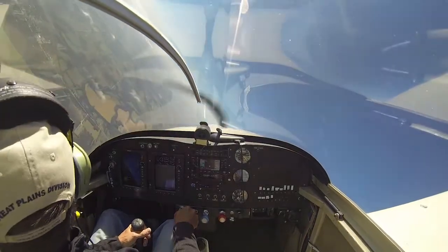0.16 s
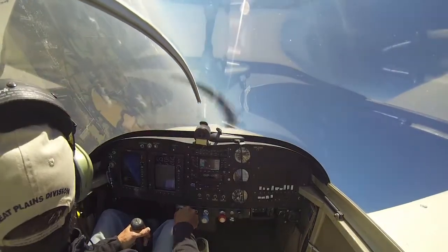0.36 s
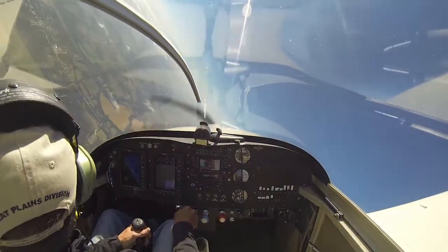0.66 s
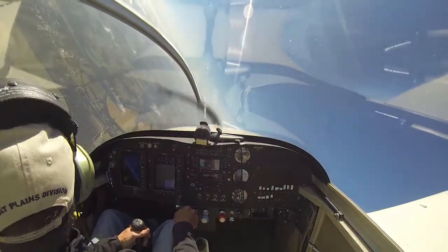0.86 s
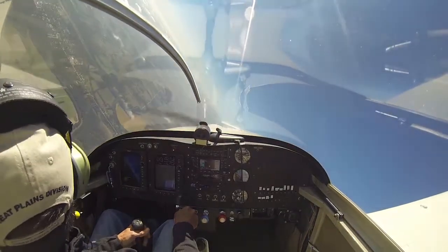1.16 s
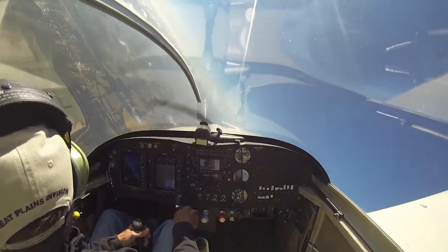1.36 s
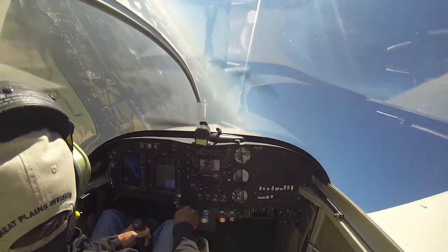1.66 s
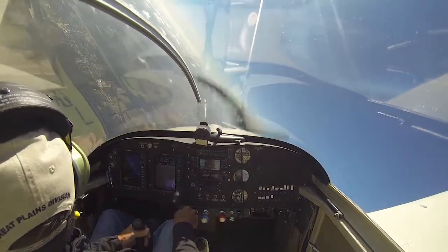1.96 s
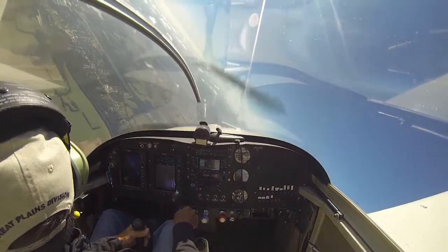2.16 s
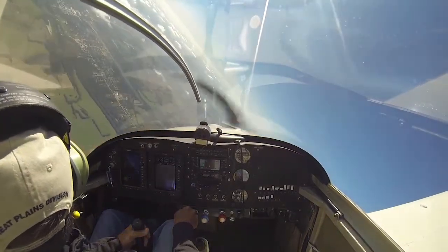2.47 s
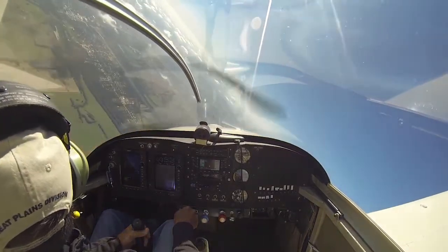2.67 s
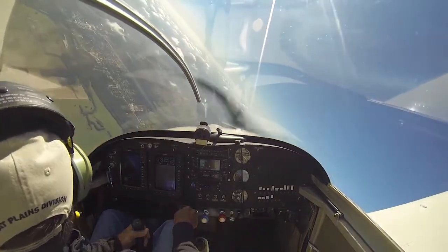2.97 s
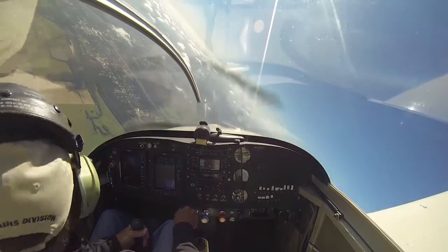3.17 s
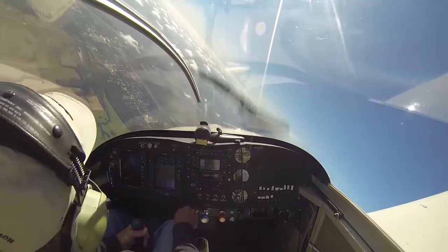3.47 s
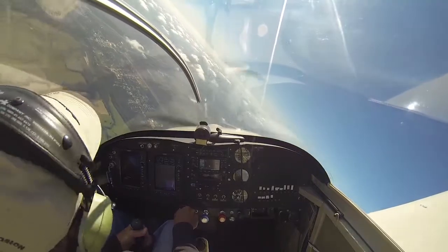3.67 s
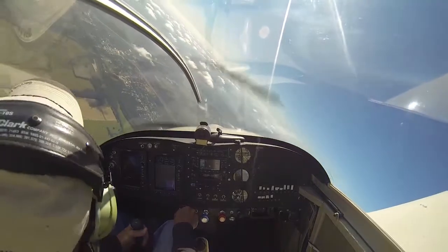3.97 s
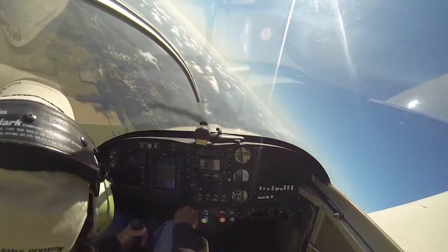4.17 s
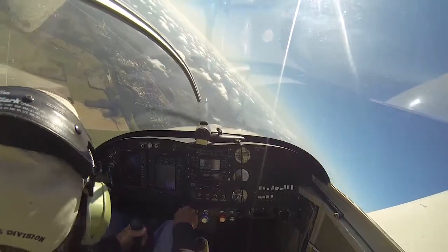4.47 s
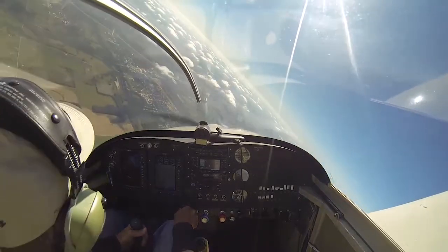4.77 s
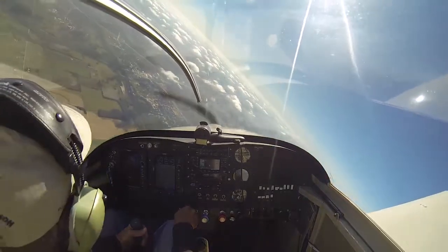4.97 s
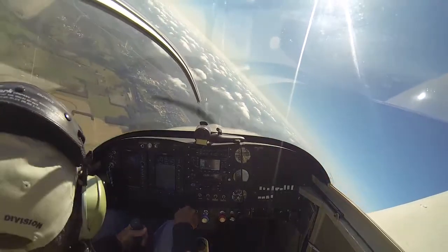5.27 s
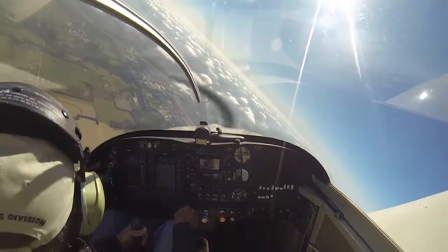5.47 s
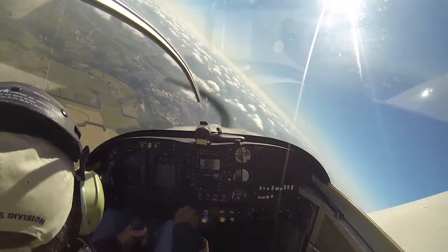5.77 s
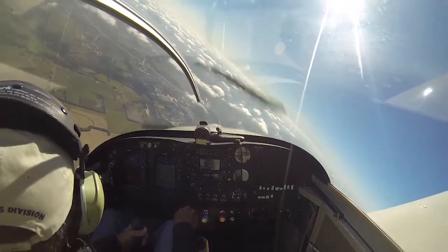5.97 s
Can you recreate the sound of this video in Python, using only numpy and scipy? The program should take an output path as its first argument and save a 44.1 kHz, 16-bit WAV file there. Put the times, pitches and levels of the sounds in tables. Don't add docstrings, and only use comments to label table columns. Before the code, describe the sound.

Continuous buzzing propeller engine drone in a small closed cockpit, with deep hull rumble and a thick, dull roar of wind that swells late.

```python
import sys
import numpy as np
from scipy import signal
from scipy.fft import rfft, irfft
from scipy.io import wavfile

SR = 44100
rng = np.random.default_rng(int(sys.argv[2]) if len(sys.argv) > 2 else 0)


def makeup_ratio(level_db):
    decades = np.asarray(level_db, float) / 20
    return 10 ** decades


def master_out(mix):
    frames = np.transpose(np.atleast_2d(mix))
    ceiling = np.clip(frames, -1, 1)
    pcm = np.round(ceiling * 32767).astype(np.int16)
    wavfile.write(sys.argv[1], SR, pcm)


N = 269892
FFT_HZ = np.maximum(np.arange(N // 2 + 1) * SR / N, 1)

# time_s, firing_hz
ENGINE_SPEED = [
    (0, 75.4),
    (1, 75.53),
    (2.2, 75.76),
    (3.5, 76.15),
    (4.7, 76.39),
    (6.12, 76.47),
]
# order (multiple of the four-stroke cycle rate), level_db (rms)
CYCLE_ORDERS = [(1, -51.8), (2, -31.6), (3, -42.8), (5, -38.5), (6, -43.4), (7, -32.9), (9, -43.3),
                (10, -42.5), (11, -44.2), (13, -33.2), (14, -44.0), (15, -30.9), (17, -45.9), (18, -49.9),
                (19, -39.0), (21, -35.6), (22, -46.0), (23, -40.9), (25, -44.6), (26, -49.3), (27, -42.8),
                (29, -39.3), (30, -45.3), (31, -40.0), (32, -41.9), (33, -48.4), (34, -44.6)]
# harmonic, exhaust_db (rms), blade_db (rms), in_phase_lead_ms
FIRING_HARMONICS = [(1, -15.5, -27, -3.88), (2, -24.5, -29.5, 1.42), (3, -30.5, -32, -1.8),
                    (4, -32, -36.5, 0.57), (5, -26, -43, 0.78), (6, -56, -36, .49), (7, -43.5, -44.5, -1.1)]
# time_s, blade_lead_ms (ahead of the exhaust), blade_loading_db
BLADE_LEAD = [(0, 0.0, 3.2), (.6, -0.5, 2.5), (1.3, -0.93, 5), (2.01, -0.68, 6.5), (2.7, -.38, 5),
              (3.1, -.2, 2), (3.55, .5, -3.5), (4.3, 1.23, 1.5), (5.2, 1.6, -3.5), (5.7, 2.9, -2.5),
              (6.12, 3.5, 2.5)]
# frequency_hz, density_db (per Hz)
HULL_SPECTRUM = [(12, -15), (30, -9), (52, -4.5), (90, -3.5), (130, -3.5), (170, -6), (210, -1.5),
                 (300, -5.5), (380, -6), (430, -8.5), (600, -7.5), (740, -7), (800, -7), (1000, -21)]
# time_s, level_db
AIRSPEED = [
    (0, -25.5),
    (1.6, -23.5),
    (2.5, -24.5),
    (3.2, -23.5),
    (4, -24),
    (6.12, -20.5),
]
# frequency_hz, density_db (per Hz)
RUSH_SPECTRUM = [(730, -34), (770, 1.5), (1080, -1.5), (1350, -9), (1900, -6.5), (2400, -19.5),
                 (3200, -21.5), (3700, -29), (4300, -28), (5500, -33), (6100, -39), (8000, -44),
                 (10200, -50), (11200, -49)]
# centre_hz, width_hz, gain_db
PANELS = [(815, 33, 3), (878, 31, 2), (859, 18, -7.5), (1373, 39, 3.5), (1636, 100, 2), (1698, 33, -7.5),
          (1754, 120, 3.5), (2330, 23, 2)]
# frequency_hz, gain_db
HOUSING_LOSS = [(11100, 0), (11900, -4), (12500, -5), (13000, -8), (14000, -10), (14300, -18), (15000, -23),
                (16000, -50)]


def rms_one(x):
    return x / np.sqrt(np.mean(x ** 2) + 1e-20)


def in_time(rows):
    time_s, *columns = np.transpose(rows)
    return [np.interp(np.arange(N) / SR, time_s, column) for column in columns]


def at_hz(points):
    hz, db = np.transpose(points)
    return np.interp(np.log(FFT_HZ), np.log(hz), db)


def drift(rate_hz):
    hop, run_in = 40, 4000
    pole = np.exp(-2 * np.pi * rate_hz * hop / SR)
    draws = rng.standard_normal(N // hop + run_in + 2)
    slow = signal.lfilter([1], [1, -2 * pole, pole * pole], draws)[run_in:]
    return np.interp(np.arange(N) / hop, np.arange(len(slow)), rms_one(slow - slow.mean()))


def turbulence(colour_db, bands, gusts, shared_db, own_db, own_rate_hz):
    bins = rfft(rng.standard_normal(N)) * makeup_ratio(colour_db)
    half_octave = np.log2(FFT_HZ / 10) * 2
    out = np.zeros(N)
    for band in bands:
        share = np.cos(np.pi / 2 * np.clip(half_octave - band, -1, 1)) ** 2
        out += makeup_ratio(own_db * drift(own_rate_hz)) * irfft(bins * share, N)
    return rms_one(makeup_ratio(shared_db * gusts) * out)


def uneven_cylinders(cycle):
    out = np.zeros(N)
    path_phase = rng.uniform(0, 2 * np.pi, len(CYCLE_ORDERS))
    for (order, level_db), phase in zip(CYCLE_ORDERS, path_phase):
        wander_db = 0.5 if order in (2, 15) else 1.3
        level = makeup_ratio(level_db + wander_db * drift(0.84))
        out += level * np.sin(order * cycle + phase + 0.088 * drift(1.9))
    return out


def exhaust_and_blades(cycle, firing_hz):
    lead_ms, load_db = in_time(BLADE_LEAD)
    out = np.zeros(N)
    for harmonic, exhaust_db, blade_db, in_phase_lead_ms in FIRING_HARMONICS:
        k = round(harmonic)
        beat = 4 * k * cycle + 0.33 * k ** 2
        slip = 2 * np.pi * k * firing_hz * (lead_ms - in_phase_lead_ms) / 1000
        exhaust = makeup_ratio(exhaust_db) * np.cos(beat)
        blades = makeup_ratio(blade_db + load_db) * np.cos(beat + slip + 0.096 * drift(2.3))
        out -= makeup_ratio(0.5 * drift(5.9)) * (exhaust + blades)
    return out


def engine():
    firing_hz, = in_time(ENGINE_SPEED)
    cycle = np.pi / 2 * np.cumsum(firing_hz) / SR
    tones = uneven_cylinders(cycle) + exhaust_and_blades(cycle, firing_hz)
    return np.sqrt(2) * tones, cycle


def hull_rumble(gusts):
    return turbulence(at_hz(HULL_SPECTRUM), range(15), gusts, shared_db=0.3, own_db=1.0, own_rate_hz=8.5)


def canopy_rush(gusts, cycle):
    panels_db = sum(db / (1 + (2 * (FFT_HZ - hz) / width) ** 2) for hz, width, db in PANELS)
    colour_db = at_hz(RUSH_SPECTRUM) + panels_db + at_hz(HOUSING_LOSS)
    wash = 1 + 0.015 * np.cos(cycle) + 0.02 * np.cos(2 * cycle)
    wash += 0.045 * np.cos(4 * cycle) + 0.044 * np.cos(8 * cycle)
    return wash * turbulence(colour_db, range(12, 22), gusts, shared_db=0.32, own_db=0.39, own_rate_hz=9.9)


def seal_whistle(gusts):
    centre_hz, width_hz = 8720, 850
    resonance = 1 / (1 + (2 * (FFT_HZ - centre_hz) / width_hz) ** 2)
    hiss = rms_one(irfft(rfft(rng.standard_normal(N)) * resonance, N))
    return makeup_ratio(0.4 * gusts + 0.7 * drift(15)) * hiss


def scene():
    rush_db, = in_time(AIRSPEED)
    swing_db = rush_db - rush_db.mean()
    hull_db = -24.5 + 0.17 * swing_db
    whistle_db = rush_db - 38 + 0.3 * swing_db
    gusts = drift(2.8)
    tones, cycle = engine()
    hull = makeup_ratio(hull_db) * hull_rumble(gusts)
    rush = makeup_ratio(rush_db + 0.84) * canopy_rush(gusts, cycle)
    whistle = makeup_ratio(whistle_db) * seal_whistle(gusts)
    return (tones + hull + rush + whistle)[None]


def low_pass(x):
    return signal.sosfilt(signal.butter(12, 15000, fs=SR, output="sos"), x)


def record(dry):
    rounded = 1.405 * np.tanh(dry / 1.394)
    return low_pass(rounded)


dry = scene()
out = record(dry)
master_out(out)
```